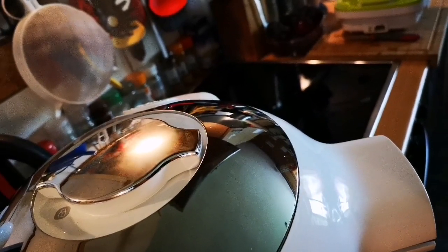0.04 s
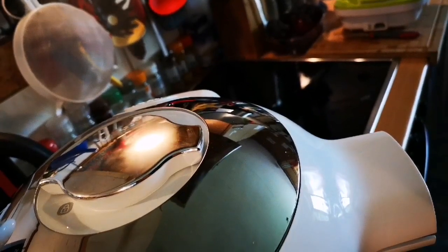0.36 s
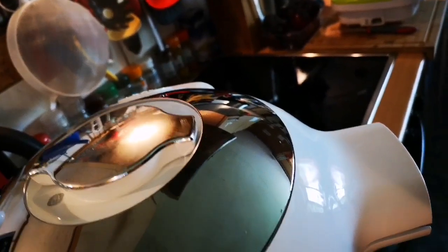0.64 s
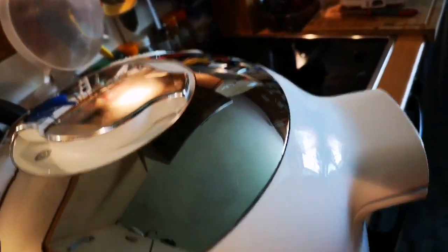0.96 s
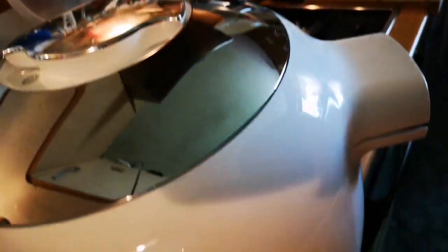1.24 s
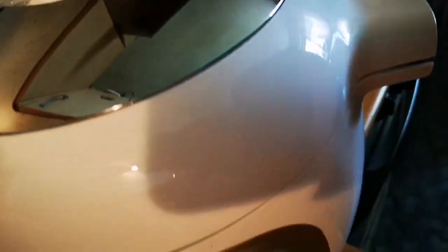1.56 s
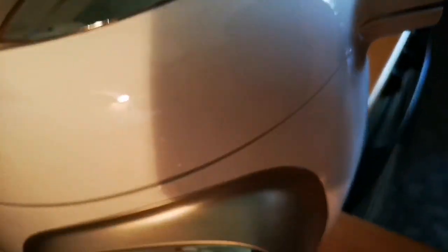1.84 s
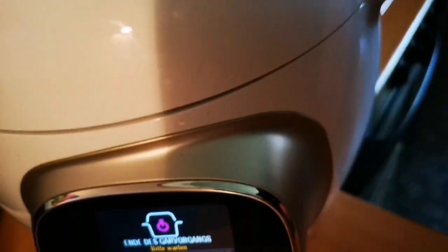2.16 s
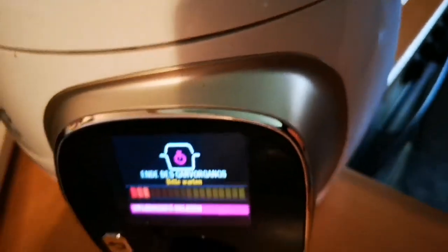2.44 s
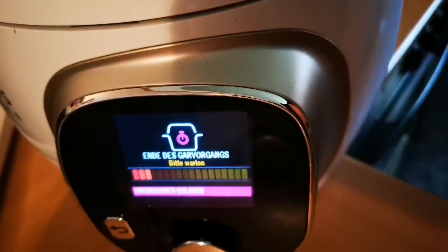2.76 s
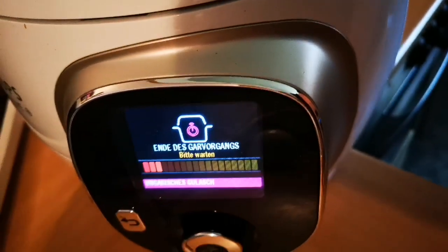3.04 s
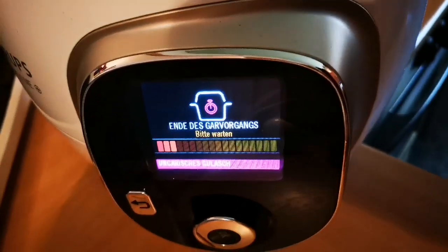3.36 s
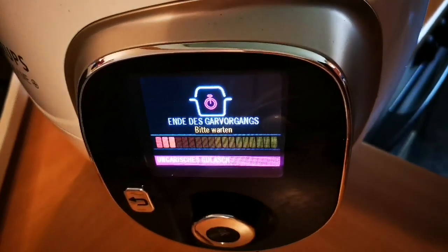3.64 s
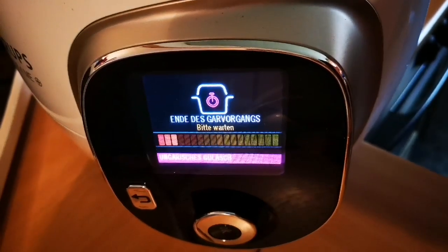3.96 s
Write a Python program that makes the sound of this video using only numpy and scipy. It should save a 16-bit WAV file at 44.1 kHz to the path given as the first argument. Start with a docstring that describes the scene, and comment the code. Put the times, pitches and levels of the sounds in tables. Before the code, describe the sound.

A pressure cooker vents a steady, bright steam hiss throughout, close by in a small kitchen, with fine water spits, a faint whistle and a low boiling rumble. Around 2 seconds the whistle fades and the hiss changes colour as the microphone moves. Dull handling thumps come from about 2.2 to 3.1 seconds. The boil swells near 3.4 seconds and again at 4, under a slightly louder hiss.

```python
"""An electric pressure cooker vents a steady jet of steam in a small kitchen while its contents boil.
We start above the lid: bright hiss, fine spits of water and a faint whistle over the rumble of the pot.
The hand-held microphone then sinks to the front panel, fastest around 2 s: the whistle fades, the hiss
changes colour, and resonances and wall echoes shift. From about 2.2 to 3.1 s the grip bumps the
microphone. The boil swells near 3.4 s and again at the end, under a slightly louder jet."""
import sys
import numpy as np
from scipy import signal
from scipy.fft import rfft, irfft
from scipy.io import wavfile
from scipy.ndimage import uniform_filter1d

SR = 44100
rng = np.random.default_rng(int(sys.argv[2]) if len(sys.argv) > 2 else 0)


def store_pcm(level_fs):
    """Save levels as 16-bit WAV."""
    pcm = np.round(np.clip(level_fs, -1, 1) * 32767).astype(np.int16)
    wavfile.write(sys.argv[1], SR, np.atleast_2d(pcm).T)


N = 176400
FRAME, HOP = 2048, 512
FRAME_HZ, FRAME_S = np.fft.rfftfreq(FRAME, 1 / SR), np.arange(N // HOP + 2) * HOP / SR
ALL_HZ, TIME = np.fft.rfftfreq(N, 1 / SR), np.arange(N) / SR

# The microphone's move, 0 above the lid to 1 at the front panel: time_s, position
MIC_PATH = [(0, 0.0346), (.9, 0.14), (1.5, 0.31), (2, 0.61), (2.6, 0.9), (4, 1)]
# Stereo image of the jet, likeness from 0 to 1: frequency_hz, likeness, left_lead_rad
JET_STEREO = [(249, 0.62, 0.91), (536, 0.61, 2.64), (1030, 0.54, 1.6), (2390, 0.59, 2.64),
              (2850, 0.37, 3.2), (3460, 0.91, 5.1), (4320, 0.57, 4.44), (5400, 0.32, 5.66),
              (6400, 0.02, 7.7), (8070, 0.25, 10.65), (15000, 0, 14.4)]
# Tone colour of the boiling pot: frequency_hz, level_db
BOIL_COLOUR = [(12, -80), (35, -72), (49, -66.5), (62, -76.5), (82, -69), (110, -62), (126, -72.5),
               (148, -76), (168, -74), (186, -80), (200, -70.5), (218, -77.5), (240, -78.5), (290, -103),
               (600, -110)]
# How hard the pot boils: time_s, gain_db
BOIL_SWELLS = [(0, -1.5), (.22, 1), (.5, -0.5), (1, .5), (1.2, -1.5), (1.5, 1), (2, -0.5), (2.6, 2.5),
               (3.05, -1), (3.37, 6), (3.48, -2), (3.75, 0.5), (4, 4.5)]
# Thumps of the grip: centre_s, level_db, pitch_hz
GRIP_BUMPS = [(2.168, -30, 48.5), (2.24, -26, 42.7), (2.275, -33, 36), (2.401, -28.5, 75.5),
              (2.425, -26.5, 36), (2.589, -40, 60), (2.639, -30.5, 40), (2.671, -28.5, 75.5),
              (2.899, -33.5, 36), (3.105, -38, 42), (3.125, -32.5, 38)]
# Standing waves along the microphone's path:
# pitch_hz, width_hz, loudest_s, reach_s, left_db, right_db, left_lead_rad
RESONANCES = [(1300, 96, 0.394, 1.95, -69, -69, 1.65), (1525, 64, 2.8, 1.3, -66.5, -73.5, -.8),
              (1620, 48, .2, .25, -76, -63.5, 3.5), (1700, 57, .9, 1.1, -63, -68, 2),
              (1830, 103, 3, 1.4, -72, -65, 0.06), (2130, 100, .9, 0.97, -65.5, -70, -2.5),
              (2424, 110, 3.6, .9, -66, -82, 1.7), (2583, 74, 0.592, 0.97, -67, -66, -0.5),
              (2600, 140, 1.9, .7, -73, -65, -2), (2760, 50, 3.3, .75, -73, -68, -4),
              (2870, 140, .8, 1.2, -65, -67, 3.5), (2830, 77, 3.2, .9, -61, -76, .8),
              (2935, 43, 1, 1.6, -70, -60.5, 3.5), (2990, 61, 3.55, .55, -62, -80, 4),
              (3250, 72, .7, 1.8, -80, -64.5, -.5), (3328, 90, 0.72, 1.6, -67, -68.5, -0.5),
              (3510, 98, 2.1, 0.37, -64, -75, -0.5), (3662, 87, 1.25, 0.66, -64.5, -66, -0.5),
              (3703, 71, 3.2, .9, -69, -69, -0.3), (4330, 100, .55, 0.83, -75, -67, 0.5),
              (4295, 98, 3.5, 1, -66.5, -74, -2.5), (4490, 110, 0.59, 1.4, -61.5, -74, 2.5),
              (4650, 160, 1.95, .5, -68, -66.5, -2), (4840, 100, .75, 0.89, -63, -74, -2),
              (4942, 57, 2.78, .48, -61.5, -61.5, -1), (5090, 82, 1.85, 0.346, -63.5, -61.5, 1.1),
              (5134, 75, 3.25, 0.94, -61, -71, 0.5), (5340, 110, 1.3, .3, -61, -72, 1.6),
              (5450, 68, 1.5, .25, -71.5, -61, 1.5), (5260, 81, 2.1, 0.2, -61, -69, 0),
              (5514, 56, 3.15, 1.17, -66.5, -62, -.4), (5610, 60, 0.38, 0.89, -64, -67.5, -2),
              (5767, 75, 1.1, 2.1, -64.5, -72, 1.5), (5840, 120, 3.1, .9, -63.5, -71, 1.5),
              (6050, 90, 3.5, .9, -68, -81, 3), (5390, 70, 3.6, .5, -70, -66.5, 0),
              (6980, 320, 1.45, 0.2, -71, -76, -3.5), (7500, 150, 2.7, .8, -71, -81, 6.5),
              (7950, 110, 3.3, 0.71, -70, -82, 4.5)]
# Tone colour of the hiss above the lid: frequency_hz, left_db, right_db
LID_COLOUR = [(305, -80.5, -81.5), (400, -74.5, -75), (750, -78, -82), (980, -71.5, -82),
              (1190, -71.5, -85), (1460, -75, -74), (1795, -72.5, -70.5), (2270, -66.5, -71),
              (2850, -68.5, -70), (3500, -68, -72), (4040, -70, -71.5), (5650, -65.5, -75),
              (6400, -69.5, -74), (8000, -68.5, -82), (8400, -77, -80), (9600, -81.5, -79),
              (10400, -81.5, -83), (15200, -88.5, -91)]
# Tone colour of the hiss at the front panel: frequency_hz, left_db, right_db
FRONT_COLOUR = [(314, -85, -83), (644, -80.5, -84.5), (910, -76.5, -77), (1250, -79.5, -76),
                (1800, -74.5, -69.5), (2330, -76, -71.5), (3050, -69, -72.5), (3490, -77, -77.5),
                (3970, -69, -74), (4650, -72, -72), (5700, -71, -74.5), (6100, -75.5, -79.5),
                (7860, -73, -79.5), (8360, -79, -85), (9350, -80.5, -75.5), (10300, -87.5, -85.5),
                (15500, -91, -92.5)]
# Strength of the jet at the microphone: time_s, gain_db
JET_SWELL = [(0, 0), (1.1, 0.1), (1.7, -0.1), (2.2, 0.6), (3, 0.5), (4, 1.54)]


def amp(db):
    """Decibels to gain."""
    return 10 ** (np.asarray(db) / 20)


def unit_rms(x):
    """Scales a signal to rms 1."""
    return x / np.sqrt(np.mean(abs(x) ** 2) + 1e-20)


def at_frequency(table, hz):
    """A table's value columns at hz, interpolated along a log-frequency axis."""
    points_hz, *columns = np.transpose(table)
    return np.array([np.interp(np.log(hz + 1), np.log(points_hz + 1), column) for column in columns])


def at_time(table, t):
    """An automation curve at times t."""
    return np.interp(t, *np.transpose(table))


def noise(gain):
    """Noise whose amplitude density follows gain across frequency."""
    return irfft(rfft(rng.standard_normal(N)) * gain, N) * np.sqrt(SR / 2)


def wander(top_hz):
    """Smooth random modulation of rms 1, rolling off above top_hz."""
    return unit_rms(noise(1 / (1 + (ALL_HZ / top_hz) ** 4)))


def boiling(surge_db=0.43, side_db=-18.5):
    """The boiling contents give a surging low rumble, close to the centre of the image."""
    colour = amp(at_frequency(BOIL_COLOUR, ALL_HZ)[0])
    mid = noise(colour) * amp(at_time(BOIL_SWELLS, TIME) + surge_db * wander(top_hz=12))
    side = np.outer([1, -1], noise(colour)) * amp(side_db)
    return mid + side


def grip_bumps(push_cycles=0.54, rub_db=-16.5, rub_s=0.059, rub_hz=118, rub_lag_s=0.0022, side_db=-15.5):
    """Each bump is one soft push of the hand with a dull rub around it."""
    mid = np.zeros(N)
    rub = unit_rms(noise(ALL_HZ / (ALL_HZ + 40) / (1 + (ALL_HZ / rub_hz) ** 8)))
    for centre_s, level_db, pitch_hz in GRIP_BUMPS:
        t = TIME - centre_s
        push = -np.cos(2 * np.pi * pitch_hz * t) * np.exp(-(t * pitch_hz / push_cycles) ** 2)
        rub_envelope = amp(rub_db) * np.exp(-((t - rub_lag_s) / rub_s) ** 2)
        mid += amp(level_db) * (push + rub * rub_envelope)
    side = np.outer([1, -1], mid) * amp(side_db) * wander(top_hz=30)  # left and right shake unequally
    return mid + side


def vent_whistle(pitch_hz=1068, waver_hz=3.54, lid_db=-51.5, front_db=-63):
    """The vent sings a faint wavering tone, heard mostly above the lid."""
    wavering_hz = pitch_hz + waver_hz * wander(top_hz=14.1)
    level_db = lid_db + (front_db - lid_db) * at_time(MIC_PATH, TIME) ** 2
    tone = np.sqrt(2) * amp(level_db) * np.exp(2j * np.pi * np.cumsum(wavering_hz) / SR)
    _, lead_rad = at_frequency(JET_STEREO, pitch_hz)
    return np.array([tone, tone * np.exp(-1j * lead_rad)]).real


def water_spits(per_s=160, level_db=-56.5, spread_db=2, decay_s=0.00074, centre_hz=8000):
    """Tiny droplets burst in the jet and give the treble a fine grain."""
    onsets = rng.random(N) < per_s / SR
    clicks = onsets * amp(spread_db * np.minimum(rng.exponential(1, N), 5))
    burst = rng.standard_normal((2, N)) * np.exp(-TIME / decay_s)
    band = (ALL_HZ / centre_hz) ** 2 / (1 + (ALL_HZ / centre_hz) ** 4)
    return amp(level_db) * unit_rms(irfft(rfft(clicks) * rfft(burst) * band, N))


def standing_waves():
    """Bands of hiss ring between pot and walls, swelling, rising and fading as the microphone passes."""
    out, position = np.zeros((2, N)), at_time(MIC_PATH, TIME)
    for pitch_hz, width_hz, loudest_s, reach_s, left_db, right_db, lead_rad in RESONANCES:
        near = abs(TIME - loudest_s) < 2 * reach_s
        band = np.sqrt(2 * SR) / (1 + (2 * (ALL_HZ - pitch_hz) / width_hz) ** 2)
        ring = np.fft.ifft(rfft(rng.standard_normal(N)) * band, N)[near]  # complex, so it can glide
        full_rise_hz = 239.5 * (pitch_hz / 5000) ** 2  # lid to front; low bands rise less
        shift_hz = full_rise_hz * (position[near] - at_time(MIC_PATH, loudest_s))
        glide = np.exp(2j * np.pi * np.cumsum(shift_hz) / SR)
        swell = np.exp(-((TIME[near] - loudest_s) / reach_s) ** 4)
        pan = [amp(left_db), amp(right_db) * np.exp(-1j * lead_rad)]
        out[:, near] += np.outer(pan, ring * glide * swell).real
    return out


def kitchen_reverb(dry, t60_s=0.2, wet_db=-14.5):
    """The small room adds a short diffuse ring."""
    tail = unit_rms(rng.standard_normal(N) * amp(-60 * TIME / t60_s)) / np.sqrt(N)
    return irfft(rfft(dry) * unit_rms(1 + amp(wet_db) * rfft(tail)), N)


def wall_echoes(position, count=24, first_s=0.003, last_s=0.022, shift_s=0.000793, corner_hz=4700):
    """Echoes off counter, cupboards and walls comb the treble; the comb shifts with the microphone."""
    strength = FRAME_HZ ** 2 / (FRAME_HZ ** 2 + corner_hz ** 2) / np.sqrt(count)
    comb = 1
    for distance, drift, polarity in rng.random((count, 3)):
        delay_s = first_s + (last_s - first_s) * distance ** 2 + shift_s * (2 * drift - 1) * position
        comb = comb + np.sign(polarity - 0.5) * strength * np.exp(-2j * np.pi * delay_s * FRAME_HZ)
    return comb / np.sqrt(1 + count * strength ** 2)


def hiss_eq_db(colour, low_cut_hz=230):
    """The EQ of the hiss at one spot, shaped channels x 1 x bins."""
    low_cut_db = 10 * np.log10(1 + (low_cut_hz / (FRAME_HZ + 1)) ** 8)
    return (at_frequency(colour, FRAME_HZ) - low_cut_db)[:, None]


def steam_jet(flutter_db=0.63, shimmer_db=0.5):
    """The turbulent jet hisses and flutters slightly, coloured by where the microphone is."""
    position = at_time(MIC_PATH, FRAME_S)[:, None]
    flutter = amp(flutter_db * wander(top_hz=21) + at_time(JET_SWELL, TIME))
    jets = np.array([kitchen_reverb(noise(1)) * flutter for _ in range(2)])
    shared, separate = signal.stft(jets, nperseg=FRAME, noverlap=FRAME - HOP)[2].swapaxes(1, 2)
    likeness, lead_rad = at_frequency(JET_STEREO, FRAME_HZ)
    right = (likeness * shared + np.sqrt(1 - likeness ** 2) * separate) * np.exp(-1j * lead_rad)
    spectra = np.array([shared * wall_echoes(position), right * wall_echoes(position)])
    # Patches of hiss, 8 frames long and 70 bins wide, drift a little in level.
    patches = uniform_filter1d(rng.standard_normal(shared.shape), size=8, axis=0)
    patches = unit_rms(uniform_filter1d(patches, size=70, axis=1))
    eq_db = (1 - position) * hiss_eq_db(LID_COLOUR) + position * hiss_eq_db(FRONT_COLOUR)
    spectra *= amp(eq_db + shimmer_db * patches)
    return signal.istft(spectra.swapaxes(1, 2), nperseg=FRAME, noverlap=FRAME - HOP)[1][:, :N]


def scene():
    """The stereo mix: steam with its resonances, spits and whistle, over the boil and the bumps."""
    return steam_jet() + standing_waves() + water_spits() + vent_whistle() + boiling() + grip_bumps()


def record(dry):
    """A steep high cut takes off the topmost air."""
    high_cut = signal.firwin(1023, 15720, window=("kaiser", 9), fs=SR)
    return signal.oaconvolve(dry, high_cut[None], "same")


dry = scene()
out = record(dry)
store_pcm(out)
```